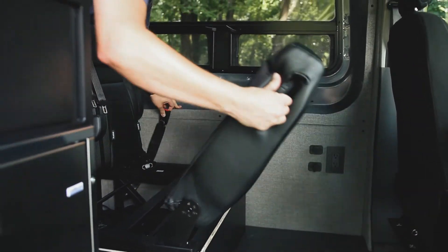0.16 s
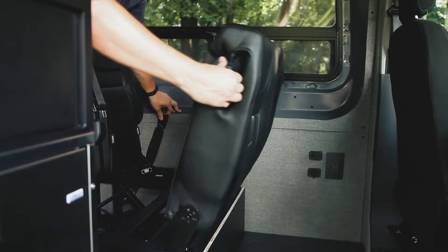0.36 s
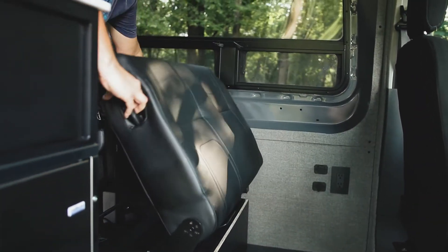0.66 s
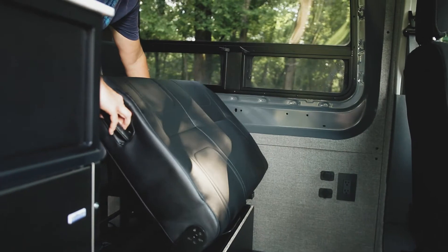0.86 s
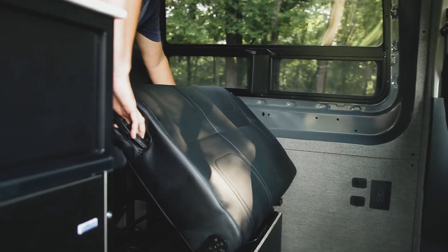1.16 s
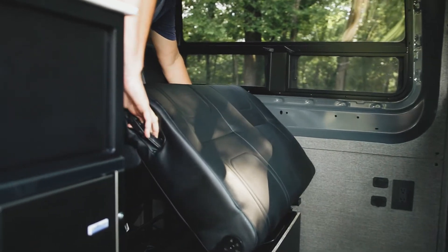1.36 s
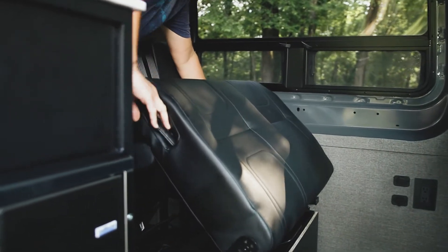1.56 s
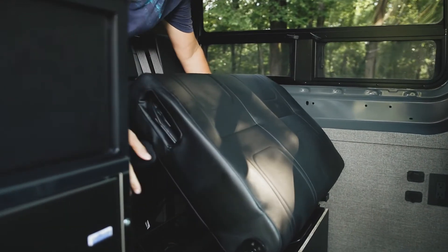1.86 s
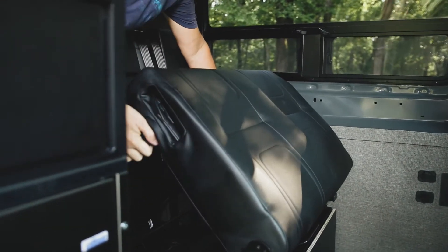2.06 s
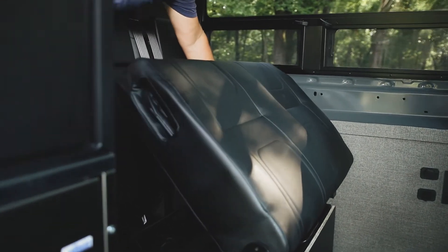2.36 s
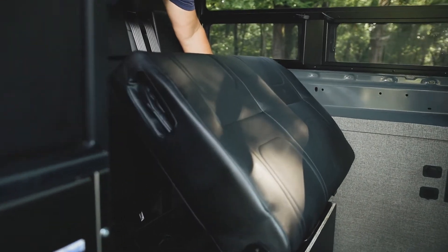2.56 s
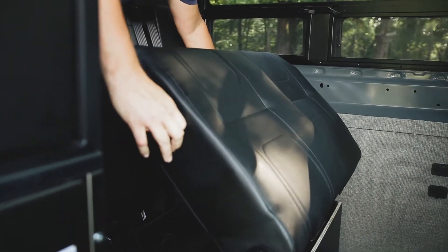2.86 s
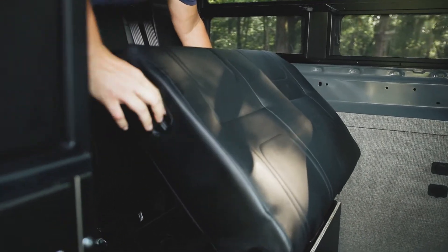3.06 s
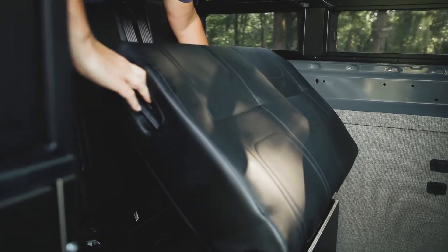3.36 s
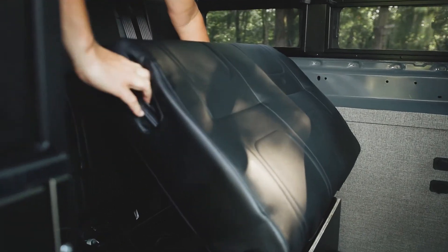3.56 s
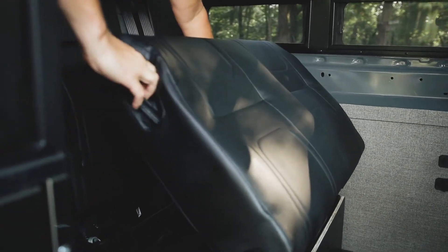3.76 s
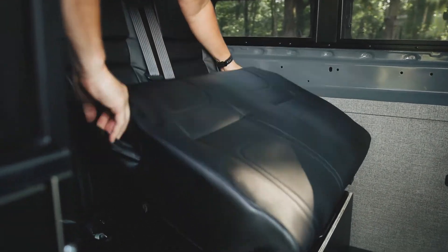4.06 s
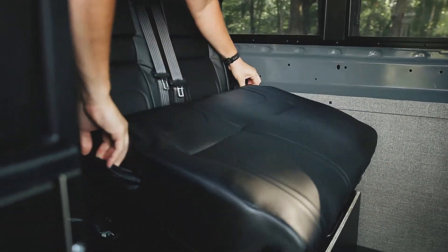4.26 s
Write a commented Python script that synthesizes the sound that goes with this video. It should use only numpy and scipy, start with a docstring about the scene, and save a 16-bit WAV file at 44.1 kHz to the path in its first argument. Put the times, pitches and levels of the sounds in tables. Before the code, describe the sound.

Close and dry in a small vehicle cabin: rustling hands, then a half-second stuttering hinge creak with bright vinyl swishing, trailing off in ticks. Muted padded bumps lead to the loudest event, a sharp metallic crack and heavier clack almost together. Afterwards it is mostly quiet, with light fumbling taps, then bumps, a thin slide and a deep soft drop. Low rumble and slight hiss underneath.

```python
"""Hands rub and knock a padded bench seat in a van: coloured noise over low rocking and faint hiss.
As the seat swings up, vinyl swishes in filtered noise and the hinge judders by stick and slip,
ringing the modes of the seat, then slows to single slips and ticks. After more knocks a latch snaps,
with a pulse and splinters, and drops home as struck modes, while the cover slides in finer noise.
Handling goes on until, in a last slide, the cushion settles as a low dying swing of air."""
import sys
import numpy as np
from scipy import signal
from scipy.io import wavfile
from scipy.ndimage import uniform_filter1d

SR = 44100
rng = np.random.default_rng(int(sys.argv[2]) if len(sys.argv) > 2 else 0)


def persist_wave(psi):
    """Save psi, clipped to +-1, as 16-bit WAV."""
    counts = np.round(np.clip(psi, -1, 1) * 32767).astype(np.int16)
    wavfile.write(sys.argv[1], SR, np.atleast_2d(counts).T)


def how_loud(loudness_db):
    """Turn decibels into a plain amplitude multiplier (0 dB gives 1, 20 dB gives 10)."""
    steps = np.asarray(loudness_db, float) / 20
    return 10 ** steps


N = 194657  # samples


def evened(x):
    """Energy normalisation: scales a signal to rms 1."""
    return x / np.sqrt(np.mean(x ** 2) + 1e-20)


def add(mix, s, sound):
    """Linear superposition: pressures add, from time s [s] on."""
    part = mix[round(s * SR):][:len(sound)]
    part += sound[:len(part)]


def level(rows):
    """Amplitude envelope: gain through rows of (time [s], level [dB]), at -120 dB outside them."""
    s, db = np.transpose(rows)
    return how_loud(np.interp(np.arange(N) / SR, s, db, -120, -120))


def noise(colour, patchy_db=0., grain_db=0.):
    """Spectral shaping of random noise to rms 1: patches drift in time and frequency, grain crackles."""
    frames, hz = N // 256 + 5, np.fft.rfftfreq(1024, 1 / SR)
    grain = np.minimum(rng.exponential(1, frames * 256), 5)
    white = rng.standard_normal(frames * 256) * how_loud(grain_db * grain)
    spectrum = signal.stft(white, nperseg=1024, noverlap=768)[2]
    patches = uniform_filter1d(rng.standard_normal(spectrum.shape), size=10, axis=0)
    patches = evened(uniform_filter1d(patches, size=6, axis=1))
    colour_hz, colour_db = np.transpose(colour)
    shape_db = np.interp(np.log(hz + 1), np.log(colour_hz + 1), colour_db, -90, -90)
    spectrum = spectrum * how_loud(shape_db[:, None] + patchy_db * patches)
    return evened(signal.istft(spectrum, nperseg=1024, noverlap=768)[1][:N])


# resonances of the seat, one list a part: base, frame, brackets, fittings
# (frequency [Hz], width [Hz], relative level [dB])
FRAME = [
    [(60.3, 43, -13), (109, 23.6, -7), (170.6, 46, -4.5), (226, 54, -1.5)],
    [(299.5, 35, -3.5), (383, 54, -1), (485, 104, 3), (592, 41.5, -4.5), (662, 60, -0.5), (810, 65, 2)],
    [(975, 130, -3.5), (1118, 180, 2), (1240, 147, -3.5), (1388, 163, 1.5), (1630, 99, -3), (1861, 105, -1),
     (2273, 150, -7.5), (2550, 130, -5.5)],
    [(3596, 280, -2.5), (4460, 320, 6), (5850, 410, 15), (6200, 1600, -13)],
]
# how long a blow presses on base, frame, brackets and light metal: (time constant [s] of each)
CONTACT_S = (0.00085, 0.00037, 0.00018, 0.0001)


def ring(modes, signs, contact_s):
    """Modal superposition: one rounded blow rings decaying modes; signs tell where it is struck."""
    hz, width, db = np.transpose(modes)[:, :, None]
    t = np.arange(3000) / SR
    decay = np.exp(-np.pi * width * t)
    free = (signs[:len(modes), None] * how_loud(db) * decay * np.sin(2 * np.pi * hz * t)).sum(0)
    blow = np.exp(-((t[:200] - 2 * contact_s) / contact_s) ** 2)
    return np.convolve(free, blow)


# how long base, frame, brackets and light metal rattle: (factor on the rattle time [ratio] of each)
RATTLE_SHARE = (1.28, 0.98, 1.04, 0.99)
SHARP_T60 = 0.13  # s; a blow that rattles longer than this starts softer
SQUARE_DB = 6  # with a set direction, the first contact stands this much further over the rattle


def strike(parts, parts_db, contacts_s, shares, t60, direction=0):
    """Repeated impact: a blow and its rattle of smaller contacts excite the modes of each part."""
    t, sound = np.arange(6000) / SR, 0
    strength_db = 3.38 * np.minimum(rng.exponential(1, len(t)), 3.5)
    contacts = 0.11 * rng.standard_normal(len(t)) * how_loud(strength_db) * (rng.random(len(t)) < .08)
    contacts[0] = min(SHARP_T60 / t60, 1) ** 2 * (how_loud(SQUARE_DB) if direction else 1)
    for db, part, contact_s, share in zip(parts_db, parts, contacts_s, shares):
        dying = contacts * how_loud(-60 * t / max(t60 * share, .004))
        signs = np.sign(direction + rng.uniform(-.5, .5, size=9))
        rung = signal.fftconvolve(dying, ring(part, signs, contact_s))
        sound = sound + how_loud(db) * rung / abs(rung).max()
    return sound


# hands working on the seat: (time [s], level of the rubbing [dB], level of the van body rocking [dB])
HANDLING = [(0, -59.5, -57.5), (.2, -54, -53.5), (.54, -51, -53), (0.731, -57, -51.5), (.86, -56, -61.5),
            (1.0, -68, -58), (1.39, -54.5, -53), (1.51, -78, -60.5), (1.75, -57.5, -49.5), (1.89, -56, -61),
            (2.03, -51.5, -55), (2.2, -62, -49.5), (2.55, -74, -58), (3.3, -62, -62.5),
            (3.53, -64.5, -59.5), (3.61, -56.5, -52), (3.74, -64.5, -55), (3.9, -66.5, -59),
            (4.15, -52.5, -52), (4.31, -52, -47), (4.41, -66, -39)]
# spectra of rubbing and rocking: (frequency [Hz], relative level per Hz [dB])
RUB_COLOUR = [(35, -52), (60, -17.5), (258, -1), (297, -7), (367, -4.5), (540, -4.5), (1190, -14),
              (1500, -13), (4000, -29), (5200, -56), (8800, -120)]
RUMBLE_COLOUR = [(3, -6), (15, 0), (30, 5), (50, -13.5), (90, -29), (160, -17)]
SHUFFLES_PER_S, SHUFFLE_DB = 51, -15.5  # mean rate of soft padding bumps; their level against the rubbing


def handling():
    """Friction noise from the cover, random soft impacts in the frame and low rocking of the van."""
    s, rub_db, rock_db = np.transpose(HANDLING)
    bumps = (rng.random(N) < SHUFFLES_PER_S / SR) * rng.standard_normal(N)
    frame_ring = ring(FRAME[1], (-1) ** np.arange(9), CONTACT_S[1])
    bumps = evened(signal.fftconvolve(bumps, frame_ring)[:N])
    rub = noise(RUB_COLOUR, patchy_db=3.0, grain_db=3.) + how_loud(SHUFFLE_DB) * bumps
    return level(np.c_[s, rub_db]) * rub + level(np.c_[s, rock_db]) * noise(RUMBLE_COLOUR)


# spectrum of the hiss common to both channels: (frequency [Hz], relative level per Hz [dB])
HISS = [(59, -29), (100, -0.5), (243, -12.5), (282, -0.5), (327, -11), (849, -9.5), (944, -9), (1100, -12),
        (1240, -15), (10800, -18), (15800, -18)]


def common_hiss():
    """Stationary random noise, fully correlated between the channels."""
    return how_loud(-60.5) * noise(HISS, patchy_db=0.87)


# spectrum of the hiss that differs between the channels: (frequency [Hz], relative level per Hz [dB])
SIDE_HISS = [(24, -34), (40, -7), (225, -3), (1700, -4), (7460, -3.5), (14700, -4), (15800, -18)]


def side_hiss():
    """Stationary random noise, to be added to the channels in opposite phase."""
    return how_loud(-63) * noise(SIDE_HISS)


# vinyl swishing as the seat swings: (time [s], level [dB])
SWISH = [(.18, -70.5), (.268, -41.5), (.286, -46), (.382, -37), (.47, -43), (.564, -50.5), (.588, -65),
         (.608, -54), (.638, -82)]
# its spectrum: (frequency [Hz], relative level per Hz [dB])
SWISH_COLOUR = [(1820, -14), (3100, 2), (3270, -2.5), (4150, -9.5), (4440, -7), (4660, -7), (5370, -6.5),
                (6500, -3), (6860, -3.5), (7650, -12), (9440, -3.5), (10400, -8.5), (13800, -11.5),
                (15700, -24)]


def swish():
    """Sliding friction: many small random contacts of the vinyl make grainy coloured noise."""
    return level(SWISH) * noise(SWISH_COLOUR, patchy_db=1.9, grain_db=3.5)


# hinge under load: (time [s], mean slip rate [1/s], strain as rms level in the frame [dB],
# level of the base [dB], boom of the cushion board [Hz])
HINGE = [(.19, 67, -67, -40, 218.6), (.225, 71.4, -43, -41, 232), (.265, 75, -36, -43.5, 400),
         (.345, 83.7, -34.5, -34.5, 570), (0.371, 80.8, -31, -54, 497), (0.419, 77, -30.5, -43, 368),
         (0.459, 68, -33, -35, 260), (.498, 64, -32, -29.5, 120.1), (.555, 59.8, -38, -37, 120),
         (0.609, 58, -48, -45, 120), (.66, 68, -60, -57, 121)]
# hinge pin, rung by each slip: (frequency [Hz], width [Hz], relative level [dB])
PIN = [(2180, 130, -3), (2387, 190, 10)]
# brackets, pin and board follow the strain: (rms level at full strain [dB], slope [dB per dB of strain])
FOLLOW = [(-37, 1.3), (-41, 1.7), (-35, 1.6)]
FULL_DB = -32  # the full strain
RUBBING = 0.62  # share of rubbing noise against clean slips


def hinge():
    """Stick and slip: each release is a jolt followed by a puff of rubbing, both ringing the seat."""
    s, *columns = np.transpose(HINGE)
    t = np.arange(s[0], s[-1], 1 / SR)
    rate, strain_db, base_db, boom_hz = (np.interp(t, s, c) for c in columns)
    uneven = 1 + 0.11 * uniform_filter1d(rng.standard_normal(len(t)), size=300)
    slips = np.cumsum(rate * uneven) / SR
    jolts = np.diff(np.floor(slips), prepend=0) * how_loud(0.68 * rng.standard_normal(len(t)))
    puffs = (1.5 + np.exp(-(slips % 1) / 1.4)) * rng.standard_normal(len(t))
    drive = (1 - RUBBING) * evened(jolts) + RUBBING * evened(puffs)

    def rung(force, modes, signs, contact_s):
        """Linear response of a part to the force, at rms 1."""
        return evened(signal.fftconvolve(force, ring(modes, signs, contact_s))[:len(t)])

    base, frame, brackets = (rung(drive, part, (-1) ** np.arange(9), contact_s)
                             for part, contact_s in zip(FRAME[:3], CONTACT_S))
    # the board is a resonance that moves with the load: shift it to 0 Hz, smooth, shift back
    turn = np.exp(2j * np.pi * np.cumsum(boom_hz) / SR)
    r = np.exp(-np.pi * 200 / SR)
    kicks = evened(jolts + 0.0014 * puffs)
    boom = evened((turn * signal.lfilter([1], [1, -2 * r, r * r], kicks / turn)).real)
    # light brackets feel more of the rubbing
    bracket_rub = rung(puffs, FRAME[2], np.ones(9), CONTACT_S[2])
    pin = rung(jolts + 0.032 * puffs, PIN, np.ones(2), CONTACT_S[3])
    layers = base, frame, evened(brackets + 1.36 * bracket_rub), pin, boom
    levels_db = [base_db, strain_db] + [db + slope * (strain_db - FULL_DB) for db, slope in FOLLOW]
    judder = sum(how_loud(db) * layer for db, layer in zip(levels_db, layers))
    return s[0], judder * signal.windows.tukey(len(t), .1)


# knocks: (time [s], peak in the frame [dB], weight: base over frame [dB],
# hardness: brackets over frame [dB], rattle t60 before each part's share [s])
KNOCKS = [(0.212, -41, -10, -4, 0.096), (0.559, -42, -9, 3, 0.062), (.605, -36.5, 2, -4, 0.054),
          (.726, -42.5, -5, -19, 0.18), (0.753, -45, -3, -9, 0.1), (.965, -42.5, -6.5, -6, .3),
          (1.228, -37.5, -16, -17, 0.12), (1.245, -41, 2.5, -2, 0.14), (1.265, -47, 6, -14, 0.11),
          (1.36, -43.5, -8, -25, 0.29), (1.415, -37.5, -14, -3.5, 0.12), (1.43, -39.5, -25, -12, .08),
          (1.702, -42, -27, -1.5, .08), (1.917, -44, -22, -6, .074), (2.012, -36, -12, -6, .037),
          (2.023, -22.5, -8.5, 4.5, 0.068), (2.0447, -22.5, -8.5, -6, 0.074), (2.062, -30, -19, 2.5, 0.27),
          (2.077, -29.5, 0.5, -6, .07), (2.108, -31, 5.5, 8, .11), (2.529, -51, -7, -2, 0.25),
          (2.834, -40, -7.5, -10, .15), (3.105, -51, 1.5, 6, 0.13), (3.268, -38.5, -18, -10, 0.081),
          (3.345, -35, -18, -8, 0.12), (3.49, -42.5, -10, -21, 0.33), (3.56, -44.5, 2.5, -7, 0.049),
          (3.615, -33.5, -1, -5.5, .13), (3.63, -35.5, -3, -9, 0.17), (3.667, -45, 6, -14, 0.13),
          (3.8, -50.5, -2, -3.5, 0.4), (3.862, -43, 9, -11, 0.18), (3.888, -53, 11, 5, 0.12),
          (3.92, -48.5, 10, 1, 0.076), (4.109, -30, -5, -0.5, 0.059), (4.122, -30, -8.5, -7.5, 0.051),
          (4.131, -50, 9, 5, 0.083), (4.149, -48, -16, 4, 0.15), (4.18, -43, -7, 4, 0.13),
          (4.275, -24.5, 0.5, -11, 0.11), (4.307, -34, -5.5, -4.5, 0.15), (4.326, -30.5, -1, -11, 0.13)]
FITTINGS_DB = -30  # small fittings answer a knock this far under the brackets


def knock(s, db, weight_db, hard_db, t60, direction=0):
    """Impact excitation: weight moves the base, hardness wakes the brackets and fittings."""
    parts_db = db + weight_db, db, db + hard_db, db + hard_db + FITTINGS_DB
    return s, strike(FRAME, parts_db, CONTACT_S, RATTLE_SHARE, t60, direction)


# last slow slips of the hinge: (time [s], peak level [dB])
SLIPS = [(.667, -48), (.697, -43.5), (.723, -46), (.75, -42.5)]


def slip(s, db):
    """Stick and slip, slowed: one late release rings the two lowest bracket modes."""
    return s, strike([FRAME[2][:2]], [db], CONTACT_S[2:], RATTLE_SHARE[2:], t60=0.045)


# metal ticks: (time [s], peak in the hinge pin [dB], peak in the small fittings [dB])
TICKS = [(.679, -53, -37), (.727, -50, -44), (.753, -48, -47), (.796, -52, -56), (.833, -59, -58),
         (.98, -50, -48), (1.245, -52, -46), (1.328, -48, -56), (1.416, -36.5, -39), (2.0183, -42, -22.5),
         (2.025, -44, -28), (3.617, -50, -44), (4.108, -35, -39.5), (4.122, -48, -40), (4.326, -59, -44)]


def tick(s, *parts_db):
    """Short-contact impact: metal on metal rings only the light parts."""
    return s, strike((PIN, FRAME[3]), parts_db, CONTACT_S[2:], RATTLE_SHARE[2:], t60=0.098)


# fine slide of the cover, one list a stroke: (time [s], level [dB])
SLIDES = [
    [(1.88, -68), (2.0, -55), (2.03, -42.5), (2.055, -57), (2.084, -41), (2.097, -46.5), (2.12, -57.5),
     (2.17, -69)],
    [(4.135, -59), (4.156, -49), (4.22, -48.5), (4.245, -49), (4.283, -44), (4.294, -55), (4.336, -55),
     (4.4, -75)],
]
# spectrum of each stroke: (frequency [Hz], relative level per Hz [dB])
SLIDE_COLOURS = [(1760, -34), (3000, -6.5), (4970, -1), (7030, -9), (8650, 1.5), (15200, -5.5),
                 (15700, -12)], [(1760, -37), (3000, -9), (3900, -15), (5080, -6), (7280, -9.5),
                 (11200, 1.5), (15700, 0)]


def slides():
    """Sliding friction: each stroke of the cover is noise of its own colour and envelope."""
    return sum(level(rows) * noise(colour, patchy_db=2.6) for rows, colour in zip(SLIDES, SLIDE_COLOURS))


# latch snapping, then dropping home: (time [s], peak in the frame [dB], base over frame [dB],
# brackets over frame [dB], rattle t60 before each part's share [s], direction [sign])
LATCH = [(2.0167, -13, -33, -4, 0.06, -1), (2.0908, -10.5, -16, -8, 0.14, 1)]


def latch(*row):
    """Coherent modal excitation: struck at one spot, all modes start the same way."""
    return knock(*row)


# steel edge of the latch: (scale of the push [dB], scale of the edge [dB], splinter t60 [s])
CRACK = (-3.5, -12.5, 0.0082)


def crack():
    """Broadband transient: a short hard push with a sharp edge, then splinters in the fittings."""
    push_db, edge_db, t60 = CRACK
    t = np.arange(1500) / SR
    push = np.exp(-((t - .0003) / .00014) ** 2) - .25 * np.exp(-((t - .0008) / .0003) ** 2)
    edge = (1 - t / .0001) * np.exp(-t / .0001)
    splinters = rng.standard_normal(len(t)) * how_loud(-60 * t / t60)
    splinters = np.convolve(splinters, ring(FRAME[3], np.ones(9), CONTACT_S[3]))[:len(t)]
    sharp = edge + 0.096 * splinters / abs(splinters).max()
    return 2.0183, how_loud(push_db) * push + how_loud(edge_db) * sharp  # starts at 2.0183 s


# cushion dropping: (starting amplitude [dB], frequency [Hz], t60 [s])
SETTLE = (-20, 18.8, 0.51)


def settle():
    """Damped oscillation: the heavy cushion pumps the cabin air in a slow dying swing."""
    db, hz, t60 = SETTLE
    t = np.arange(SR // 4) / SR
    return 4.292, how_loud(db - 60 * t / t60) * np.sin(2 * np.pi * hz * t)  # starts at 4.292 s


def scene():
    """Superposition at one microphone: only a faint hiss differs between the channels."""
    mid = handling() + common_hiss() + swish() + slides()
    side = side_hiss()
    for source in (hinge, crack, settle):
        add(mid, *source())
    for source, rows in ((knock, KNOCKS), (slip, SLIPS), (tick, TICKS), (latch, LATCH)):
        for row in rows:
            add(mid, *source(*row))
    return np.array([mid + side, mid - side])


def band_limit(x):
    """A steep low-pass at the top of the band."""
    return signal.sosfilt(signal.butter(12, 16550, fs=SR, output="sos"), x)


def record(dry):
    """Direct-current bias: the converter adds a small steady offset."""
    mix = dry + how_loud(-50.5)
    return band_limit(mix)


dry = scene()
out = record(dry)
persist_wave(out)
```